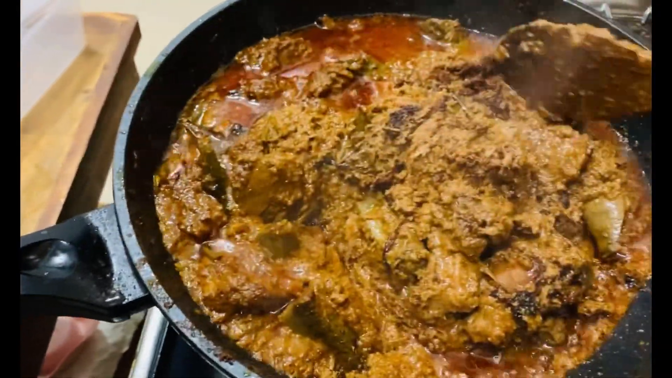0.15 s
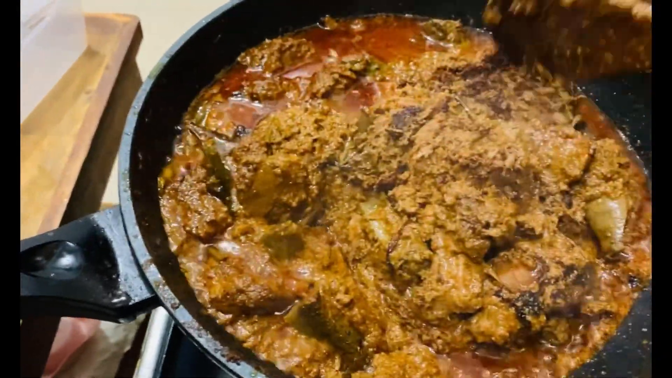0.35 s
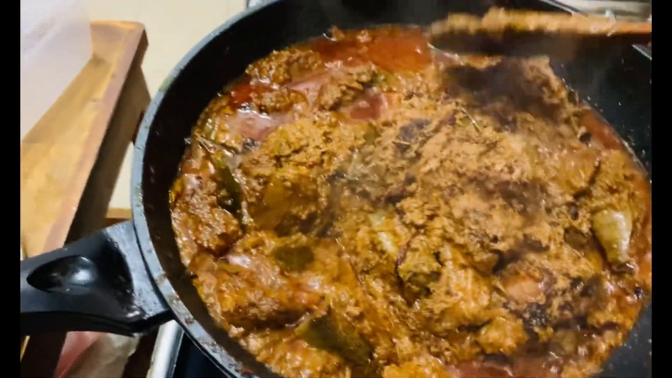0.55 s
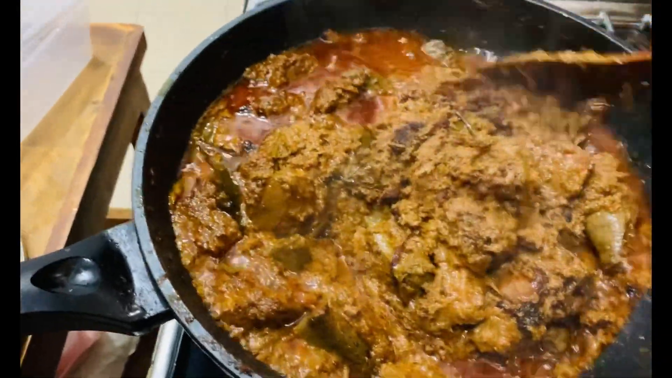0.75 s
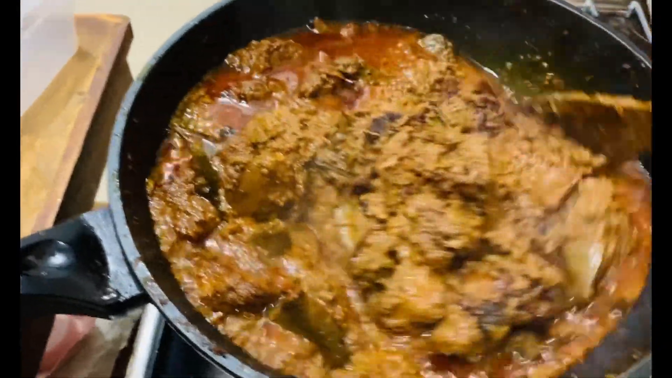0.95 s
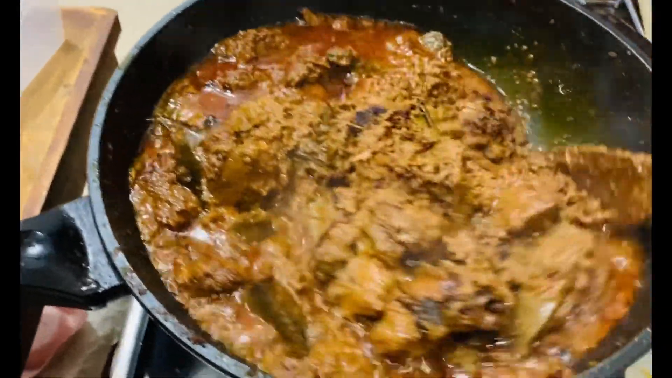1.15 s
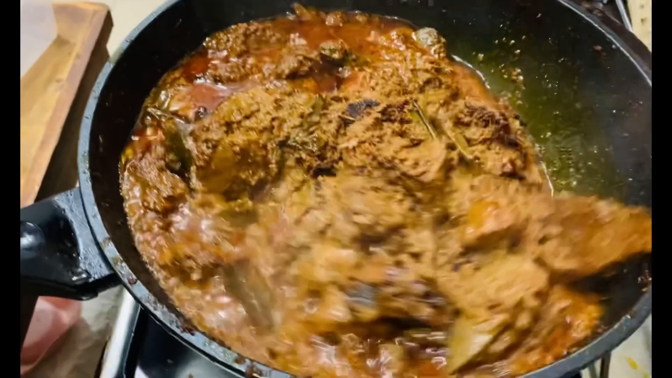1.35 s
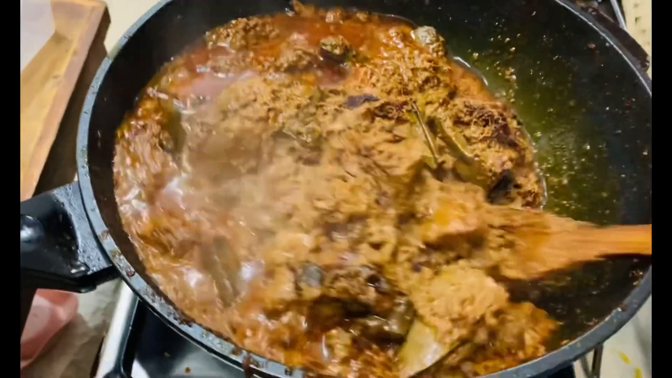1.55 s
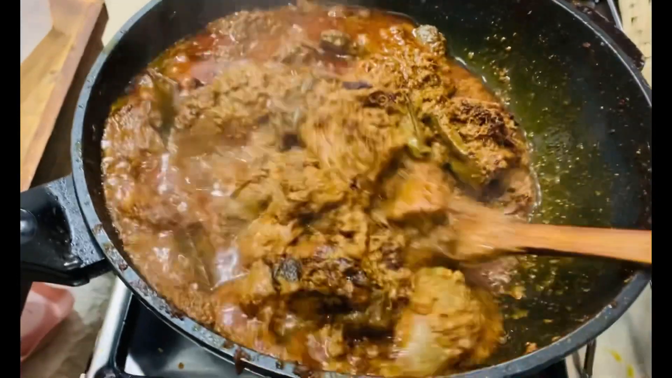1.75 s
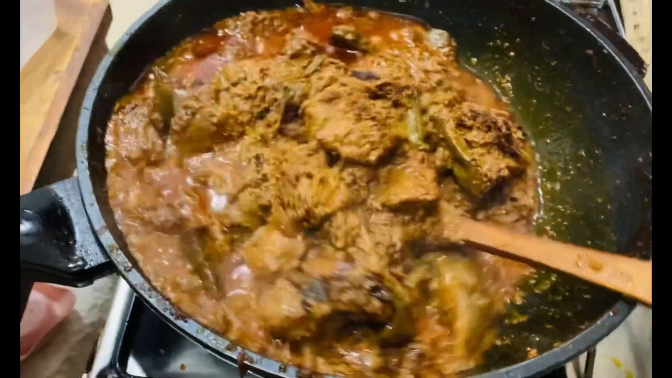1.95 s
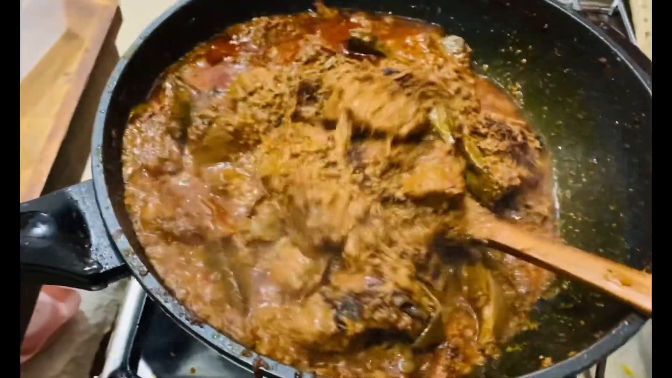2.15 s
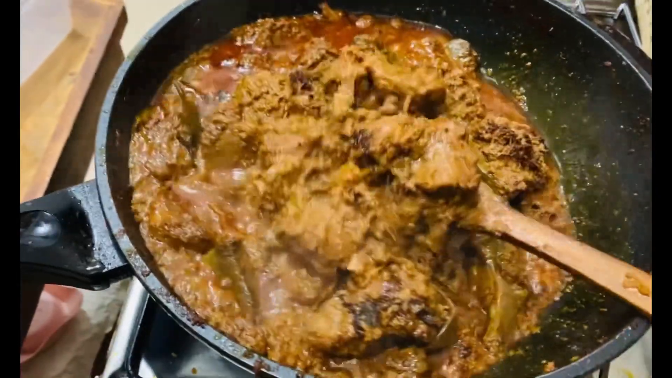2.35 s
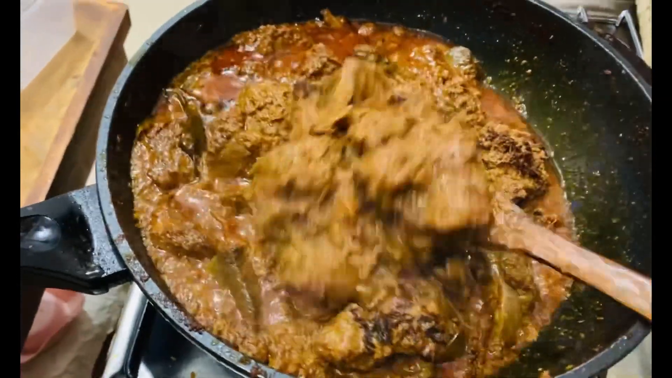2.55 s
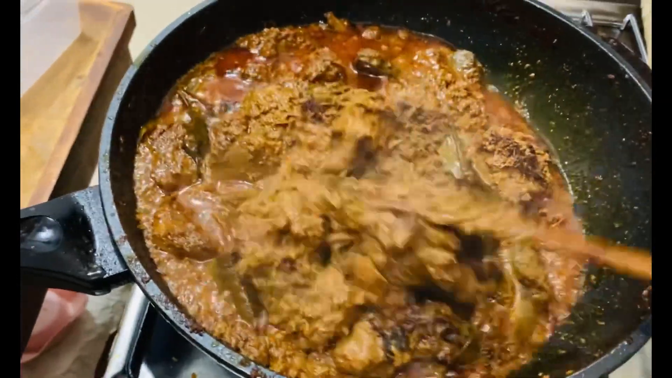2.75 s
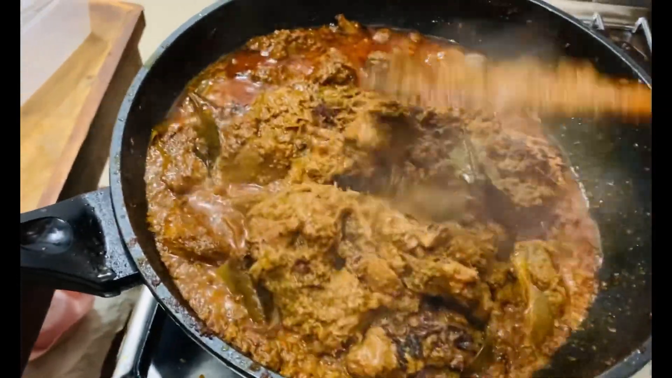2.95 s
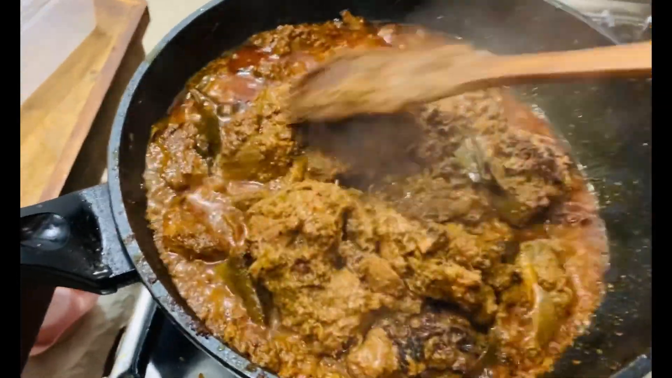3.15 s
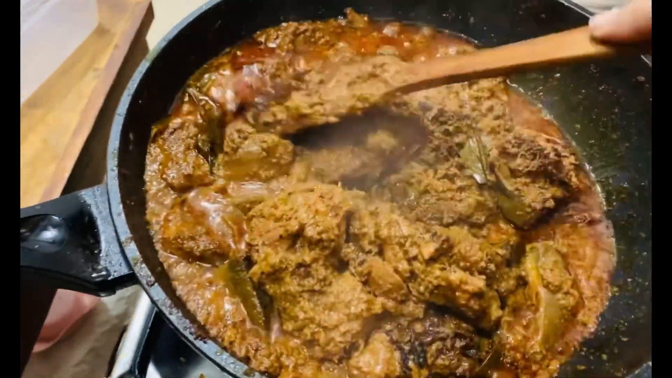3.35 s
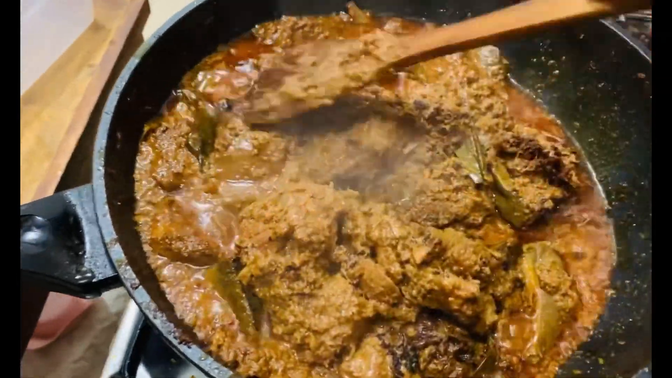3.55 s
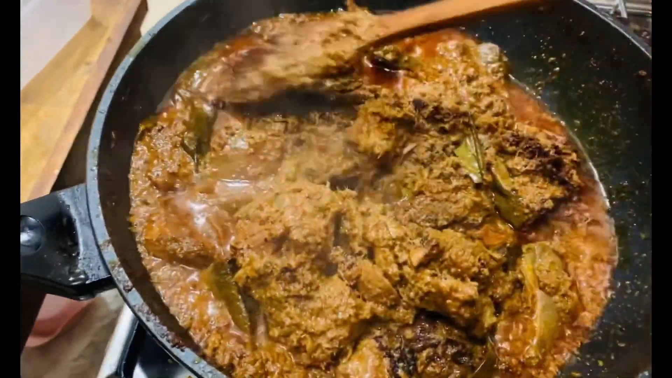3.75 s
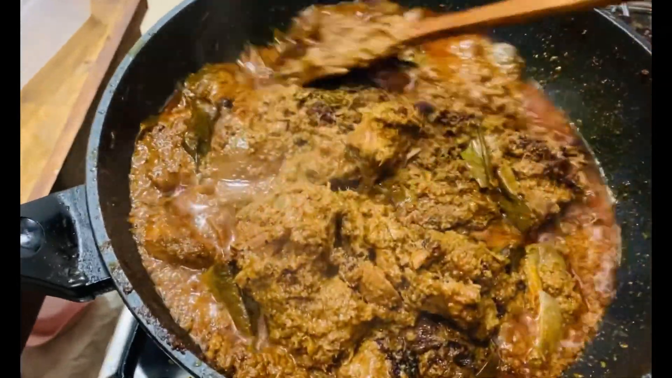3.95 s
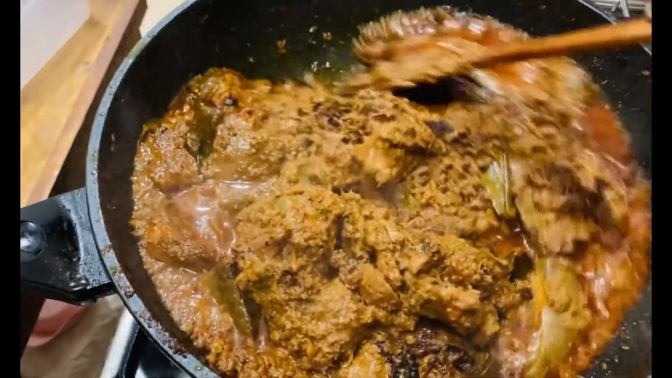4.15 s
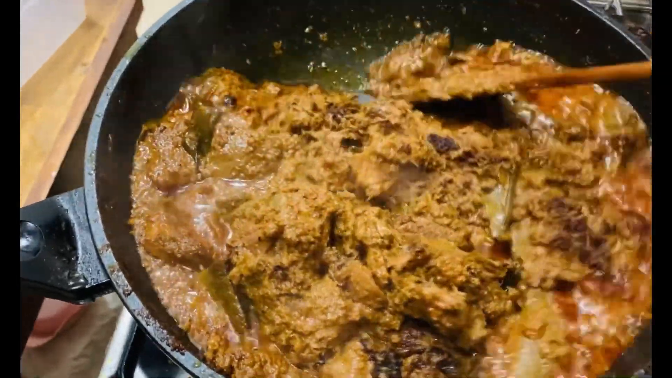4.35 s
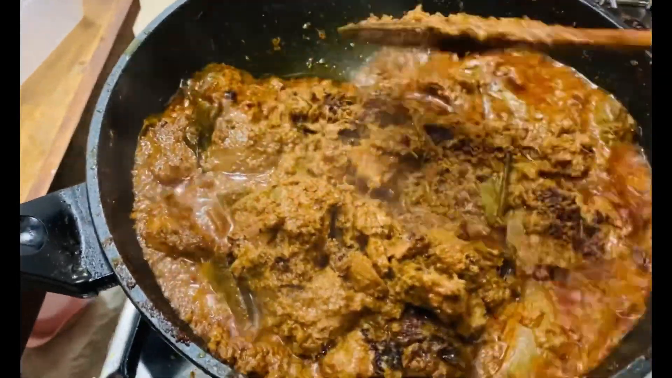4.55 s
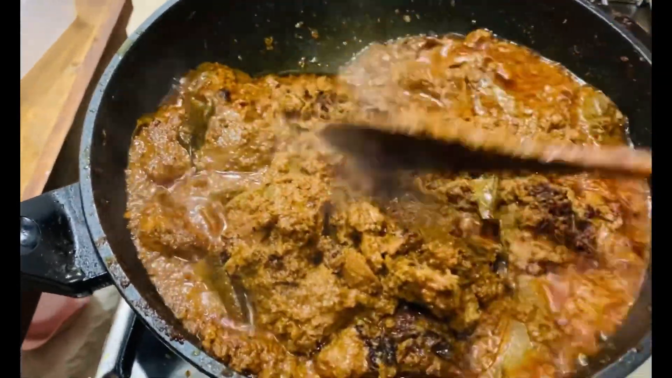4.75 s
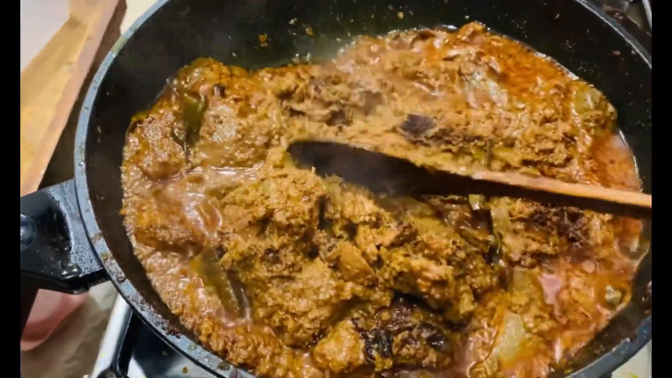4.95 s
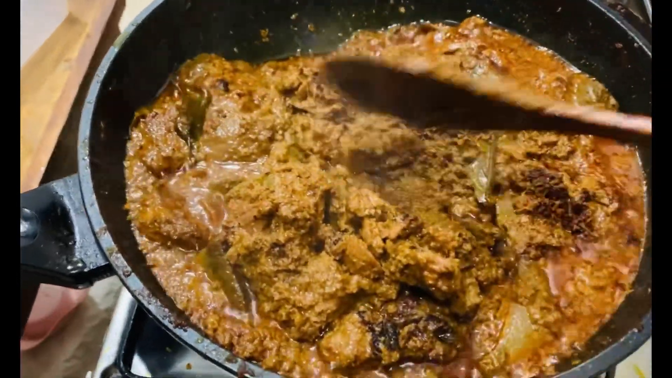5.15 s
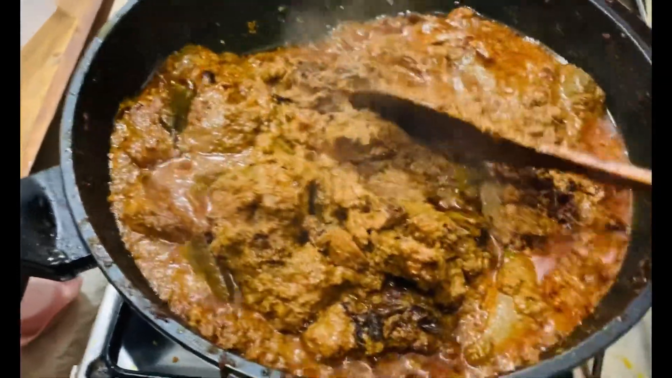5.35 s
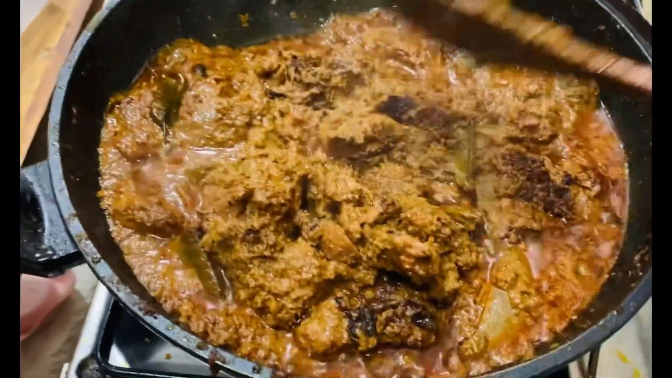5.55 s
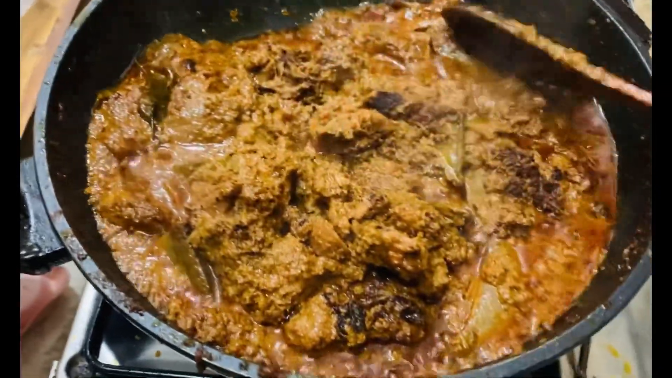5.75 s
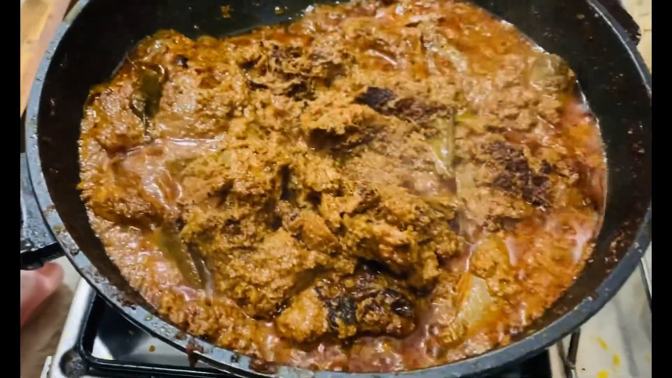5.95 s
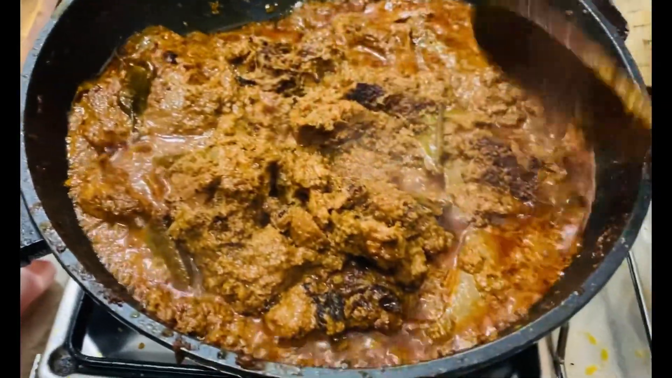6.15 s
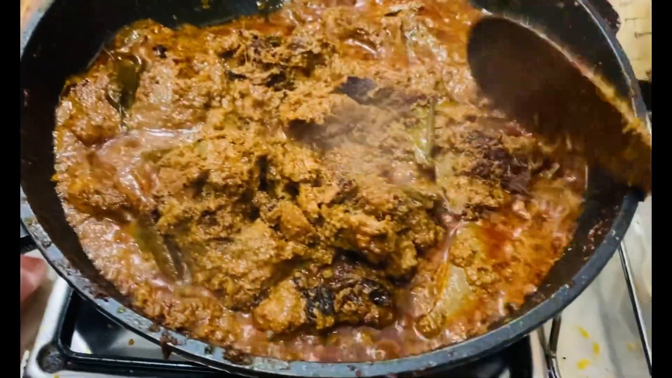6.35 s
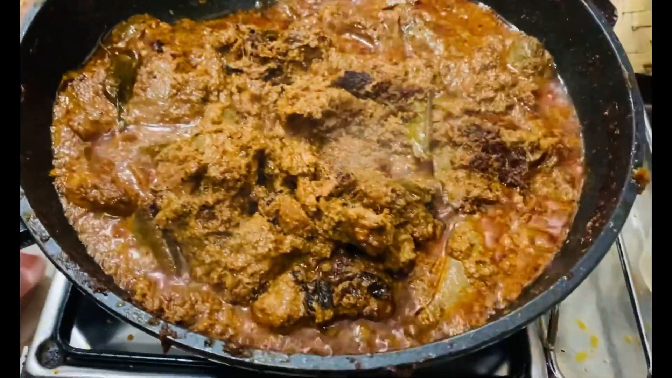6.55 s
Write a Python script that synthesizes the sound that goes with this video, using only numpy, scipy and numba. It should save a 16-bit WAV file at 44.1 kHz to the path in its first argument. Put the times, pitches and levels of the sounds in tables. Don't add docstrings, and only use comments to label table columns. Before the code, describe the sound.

Close up in a small kitchen, thick curry simmers in a wok over softly roaring gas. Oil sizzles and spits brightly at first, a spatula lands with a hollow thud, then stirring strokes release steamy hisses and light scrapes. The sizzle thins to slow blubs, pops and ticks, until two hard wooden knocks ring the wok and rattle it on the grate.

```python
import sys
import numpy as np
from scipy import signal
from scipy.fft import rfft, irfft
from scipy.io import wavfile
from scipy.ndimage import uniform_filter1d
from numba import njit

SR = 44100
rng = np.random.default_rng(int(sys.argv[2]) if len(sys.argv) > 2 else 0)


def volts_from_db(level):
    exponent = np.asarray(level, float) / 20
    return 10 ** exponent


def waveform_to_disk(signal):
    frames = np.transpose(np.atleast_2d(signal))
    scaled = np.clip(frames, -1, 1) * 32767
    samples = np.round(scaled).astype(np.int16)
    wavfile.write(sys.argv[1], SR, samples)


N = 290619
FREQS = np.arange(N // 2 + 1) * SR / N
TOP_HZ = 15870


def level(x, db):
    return x * volts_from_db(db) / np.sqrt(np.mean(x ** 2))


def colour(x, points):
    hz, db = np.transpose(points)
    gain = volts_from_db(np.interp(np.log(FREQS + 1), np.log(hz), db, left=-60, right=-60))
    return level(irfft(rfft(x) * gain, N), 0)


def walk(rate):
    hold = int(SR / rate)
    steps = np.repeat(rng.standard_normal(N // hold + 1), hold)
    return 0.71 * uniform_filter1d(steps, hold)[:N]


@njit
def rings(start, hz, t60, glide, size):
    out = np.zeros(N)
    for e in range(len(start)):
        n = int(t60[e] * SR) + 2
        fade = 1000. ** (-1. / n)
        step, turn = 2 * np.pi * hz[e] / SR, glide[e] ** (1. / n)
        a, phase, first = size[e], 0., int(start[e] * SR)
        for i in range(first, min(first + n, N)):
            out[i] += a * np.sin(phase)
            a, phase, step = a * fade, phase + step, step * turn
    return out


@njit
def svf(x, hz, sharp):
    y, b, l = np.empty(len(x)), 0., 0.
    for i in range(len(x)):
        g = np.tan(np.pi * hz[i] / SR)
        v = (b + g * (x[i] - l)) / (1 + g * (g + 1 / sharp[i]))
        b, l, y[i] = 2 * v - b, l + 2 * g * v, v / np.sqrt(sharp[i])
    return y


def body(modes, lag_s):
    hz, db, t60 = np.transpose(modes)
    signs = (-1.) ** np.arange(len(hz))
    return rings(lag_s + 0 * hz, hz, t60, 1 + 0 * hz, volts_from_db(db) * signs)[:SR]


def swarm(rate, low_hz, high_hz, cycles, spread_db, glide, hiss):
    u = rng.random((int(12000 * N / SR), 4))[:int(rate * N / SR)].T
    hz = low_hz * (high_hz / low_hz) ** u[1]
    db = np.minimum(-spread_db * np.log(1 - u[2]), 5 * spread_db)
    t60 = cycles * (.5 + u[3]) / hz
    bubbles = rings(u[0] * N / SR, hz, t60, glide + 0 * hz, volts_from_db(db) * np.sqrt(hz))
    bubbles = colour(bubbles, [(low_hz / 2, 0), (high_hz * 3.8, 0)])
    here = level(bubbles, 0) + hiss * rng.standard_normal(N)
    return np.array([here, np.roll(here, SR)])


def bursts(table, cycles, glide, gain_db, snap, tear_s=.0045, crowd=.61):
    s, db, hz = np.transpose(table)
    size, flat = volts_from_db(db + gain_db), np.ones(len(s))
    out = rings(s, hz, cycles / hz, glide * flat, size)
    out += rings(s, 1.3 * hz, 1.6 / hz, flat, 2 * snap * size)
    for late, pitch, small in rng.random((128, 3, 3))[:len(s)].T:
        near_hz = np.minimum(hz * (.65 + .9 * pitch), TOP_HZ)
        out += rings(s + tear_s * late, near_hz, cycles / hz, glide * flat, crowd * small * size)
    return out


# t/s, heat level/dB
BARED_HEAT = [(0, 1), (.2, -0.5), (.7, -1.5), (.94, 1), (1.14, -1.5), (1.32, -1.5), (1.5, 1), (1.85, 0),
              (2.05, -3.5), (2.8, -5), (3.05, -7.5), (3.36, -4.5), (3.61, -9), (4.2, -5.5), (4.64, -8),
              (5.4, -8), (5.8, -8.5), (6.59, -7.5)]


def heated(full_db, slope):
    s, heat_db = np.transpose(BARED_HEAT)
    return full_db + slope * np.interp(np.arange(N) / SR, s, heat_db)


# f/Hz, level/dB per Hz
SIZZLE_COLOUR = [(3000, -20.5), (6000, -6), (7000, -5), (8600, 6), (10500, 2.5), (13000, 2), (15700, 3.5)]


def sizzle():
    fizz = swarm(rate=8700.0, low_hz=5053.0, high_hz=16360.0, cycles=27.0, spread_db=4.5, glide=0.92, hiss=0.99)
    gusts = 2.0 * walk(19) + 1.5 * walk(45)
    return colour(fizz, SIZZLE_COLOUR) * volts_from_db(heated(-42.5, 1.166) + 6.0 + gusts)


# f/Hz, level/dB per Hz
CRACKLE_COLOUR = [(1500, -17), (1750, -5), (2200, -5.5), (3400, 0.5), (4500, -0.5), (5600, -5.5),
                  (6600, -0.5), (8000, -9.5)]


def crackle(surge):
    snaps = swarm(rate=380., low_hz=1500., high_hz=7000., cycles=30., spread_db=2.6, glide=1.1, hiss=1.0)
    return colour(snaps, CRACKLE_COLOUR) * volts_from_db(heated(-44.5, 0.99) - .5 + 1.9 * surge + 1.5 * walk(9))


# f/Hz, level/dB per Hz
BLUB_COLOUR = [(120, -35), (200, -3), (300, 0.5), (450, 4), (600, 1), (800, -2), (1100, -26.5)]
# f/Hz, level/dB per Hz
SPUTTER_COLOUR = [(500, -1), (850, -5.5), (1150, -2), (1440, -4), (1560, -6), (1800, -8), (2400, -9.5),
                  (3500, -11)]


def paste(surge):
    blubs = swarm(rate=300., low_hz=180., high_hz=1000., cycles=8., spread_db=1.7, glide=1.2, hiss=1.3)
    small = swarm(rate=500., low_hz=696.0, high_hz=3016.0, cycles=13., spread_db=1.24, glide=1.15, hiss=1.6)
    blubs = colour(blubs, BLUB_COLOUR) * volts_from_db(heated(-47, 0.12) - 2.5 + 1.4 * surge)
    small = colour(small, SPUTTER_COLOUR) * volts_from_db(heated(-41.5, 0.68) - 2.5 + .7 * surge)
    return blubs + small


# f/Hz, level/dB per Hz
FLAME_COLOUR = [(24, -39), (48, -7.5), (70, -15.5), (97, -3.5), (165, -12), (220, -2.5), (300, -2.5),
                (640, -35)]
# middle t/s, half length/s, rumble level/dB
DRAGS = [
    (0.841, 0.094, 10),
    (1.624, 0.32, 9.5),
    (2.596, 0.212, 4.5),
    (3.298, 0.23, 2.5),
    (4.297, 0.2, 5),
]


def flame():
    t = np.arange(N) / SR
    shake = sum(db * np.exp(-((t - s) / half) ** 4) for s, half, db in DRAGS)
    roar = colour(rng.standard_normal((2, N)), FLAME_COLOUR)
    bass = signal.sosfilt(signal.butter(2, 150, fs=SR, output="sos"), roar)
    return (roar + (volts_from_db(shake) - 1) * bass) * volts_from_db(-52 + 0.91 * walk(5.7))


# t/s, peak level/dB, f/Hz
CRACKS = [
    (0.0393, -31, 14700),
    (0.4959, -18.5, 15400),
    (1.051, -18, 15000),
    (1.2855, -21, 14800),
    (1.6716, -34, 15600),
    (1.8208, -12, 15440),
    (1.976, -32, 15000),
]


def cracks():
    return bursts(CRACKS, cycles=15.0, glide=.97, gain_db=7.0, snap=0.45, tear_s=.001, crowd=.5)


# t/s, peak level/dB, f/Hz
PLOPS = [(0.055, -32, 354), (0.28, -36.5, 758), (0.885, -32.5, 258), (0.94, -38, 240), (0.97, -38, 266),
         (1.288, -32, 303), (1.819, -26, 740), (1.954, -33, 820), (2.057, -45, 950), (2.107, -26, 923),
         (2.247, -24, 835), (2.426, -46.5, 222), (2.52, -27.5, 716), (2.807, -37, 263), (2.946, -34, 294),
         (2.7, -30, 750), (3.171, -34, 390), (3.2, -31, 530), (3.326, -34, 274), (3.394, -31.5, 390),
         (3.525, -36, 224), (3.719, -39, 473), (3.768, -33.5, 546), (3.804, -38, 310), (3.931, -30, 680),
         (4.02, -34, 310)]


def plops():
    return bursts(PLOPS, cycles=9., glide=1.12, gain_db=-3, snap=.05)


# t/s, peak level/dB, f/Hz
SPITS = [(0.0667, -34, 10800), (0.0887, -22, 9800), (0.1585, -34.5, 10040), (0.2274, -23.5, 10870),
         (0.2495, -24, 10400), (0.3856, -28, 10500), (0.4966, -25.5, 12200), (0.511, -29.5, 10400),
         (0.5412, -31, 10340), (0.7545, -25, 11100), (0.816, -24, 10400), (0.9073, -29, 11600),
         (1.051, -15, 10800), (1.285, -32, 10100), (.7288, -23, 9800), (1.5868, -40, 10620),
         (1.6911, -35, 11100), (1.804, -21, 11540), (2.168, -36, 10650), (2.3161, -25.5, 10100),
         (2.4997, -29.5, 11000), (4.884, -29, 10300), (4.9043, -27, 10300), (5.1153, -28.5, 10400),
         (5.3433, -30, 10660), (5.841, -31.5, 10600), (6.1248, -24.5, 9700), (6.33, -29.5, 10700),
         (6.379, -32, 12000), (6.571, -29, 10550)]


def spits():
    return bursts(SPITS, cycles=19.0, glide=0.58, gain_db=7.5, snap=0.5)


# t/s, peak level/dB, f/Hz
SNAPS = [(0.0887, -20.5, 7130), (0.1005, -18, 6910), (0.14, -22.5, 5860), (0.53, -23.5, 7170),
         (0.5844, -22.5, 6320), (0.641, -20, 4760), (0.6791, -31, 7200), (0.7288, -20, 6700),
         (1.691, -20.5, 7300), (1.74, -18, 6020), (1.823, -28, 4650), (5.3447, -24, 4960)]
# t/s, peak level/dB, f/Hz
POPS = [(0.184, -34, 1810), (0.2844, -24.5, 1300), (1.0771, -28.5, 1460), (1.2614, -30, 1822),
        (1.4945, -28, 1480), (1.5467, -26.5, 2140), (1.725, -29, 1770), (1.8543, -30.5, 1500),
        (1.976, -31, 1283), (2.0588, -37, 1440), (2.2469, -31, 1250), (2.5697, -33, 1310), (2.7, -33, 1385),
        (3.1863, -32.5, 1527), (3.327, -34, 1800), (3.4142, -34.5, 1450), (3.7643, -32, 1860),
        (4.104, -37, 1413), (4.1707, -29, 1300), (4.237, -28.5, 1300), (4.5275, -32.5, 1440),
        (4.8982, -31.5, 1410), (4.9462, -29, 1463), (4.9871, -32.5, 1552), (5.095, -35, 1340),
        (5.224, -35.5, 1274), (5.682, -39, 1420), (5.7044, -27.5, 1940), (5.787, -34, 1630),
        (5.8405, -30, 1470)]
# t/s, peak level/dB, f/Hz
STIRRED = [(1.605, -30.5, 1497), (1.712, -30, 1705), (2.133, -34, 1220), (2.169, -37, 1286),
           (2.3146, -31, 1270), (2.4797, -44, 1080), (2.4998, -35.5, 1230), (2.584, -29.5, 2030),
           (2.6712, -37, 1430), (3.526, -41, 1200), (3.5951, -33.5, 1480), (3.7208, -38, 1277),
           (3.7403, -41.5, 1210), (3.8071, -30.5, 1930), (4.14, -35, 1186), (4.2012, -45, 1080),
           (4.2692, -30, 1600)]


def pops():
    when, pitch = rng.random((30, 2)).T
    stray_hz = 1308 * 2 ** (1.4 * pitch ** 2)
    strays = list(zip(when * N / SR, np.full(30, -35.), stray_hz))
    table = POPS + STIRRED + SNAPS + strays
    return bursts(table, cycles=16.0, glide=1.2, gain_db=1.0, snap=0.18, tear_s=.005, crowd=.8)


# t/s, peak level/dB, f/Hz
FINE_POCKETS = [(.7285, -25, 2380), (.729, -23, 3310), (.7288, -28.5, 1250), (.641, -27.5, 2600),
                (.7283, -21, 905), (.7683, -29, 1000), (2.058, -19, 6200), (2.38, -31, 3900),
                (2.39, -30.5, 3400), (2.4614, -28, 4200), (2.51, -28, 5200), (2.7462, -42.5, 2030),
                (2.835, -31, 3720), (3.0944, -33, 2020), (3.1665, -25, 1157), (3.769, -29, 4800),
                (3.829, -30, 2100), (3.871, -33, 2000), (3.876, -33, 2900), (3.885, -28.5, 4240),
                (3.929, -35, 3800), (3.988, -33, 2000), (4.005, -29, 6300), (4.0253, -36, 2770),
                (4.107, -31, 2510), (4.1185, -28, 3600), (4.2014, -33.5, 2130), (4.3092, -34, 2300),
                (4.616, -29, 5010), (4.657, -31.5, 1110), (4.7137, -38.5, 2420), (5.2475, -40, 3520),
                (5.4745, -37, 3400), (5.5977, -37, 2800), (5.7873, -42, 2710), (5.902, -36, 2065),
                (5.9095, -34, 2780), (5.9409, -33.5, 5000), (6.109, -33, 2810), (6.3095, -26.5, 2855),
                (6.393, -29.5, 3300)]


def fine_pockets():
    return bursts(FINE_POCKETS, cycles=12.0, glide=1.5, gain_db=-1.5, snap=0.43, tear_s=.003, crowd=0.46)


# f/Hz, level/dB, t60/s
WOK_MODES = [(507, -1.5, 0.034), (650, -12.5, 0.061), (871.5, 0, 0.067), (1110, 5.5, 0.028),
             (873.5, -14, 0.43), (1000, -9, 0.12), (848, -14, 0.11), (1237, -5, 0.08), (1524, -26, 0.15),
             (1810, -15.5, 0.1), (2337, -11.5, 0.091), (1250, -21.5, 0.28), (2600, -15, 0.069)]
# f/Hz, level/dB, t60/s
GRATE_MODES = [(215, -9, 0.105), (274.2, -11, 0.17), (340, -9.5, 0.028), (302, -16.5, 0.3),
               (396, -15, 0.036), (576, -21.5, 0.21), (467, -15.5, 0.034)]
# f/Hz, level/dB, t60/s
BOOM_MODES = [(91, 1.5, 0.417), (110.7, -0.5, 0.54), (65.2, -2.5, 0.35), (43.8, -4, 0.31)]
# f/Hz, level/dB per Hz
RATTLE_COLOUR = [(150, -9), (230, 1), (500, -7.5), (700, -9), (900, -11), (1250, -12), (1400, -27),
                 (2600, -23)]
# t/s, blow level/dB, contact/ms, grate share level/dB
KNOCKS = [
    (0.7268, -42.5, 0.99, 17.5),
    (1.289, -42, 0.69, 3),
    (6.1189, -29.5, .4, -9),
    (6.1196, -13, 0.52, -1.5),
    (6.3273, -23, .35, -10),
    (6.3284, -10, 0.67, -0.5),
]


def knocks():
    wok, grate = body(WOK_MODES, 0), body(GRATE_MODES, 0.0023)
    wok, grate = signal.sosfilt(signal.butter(2, 140, "high", fs=SR, output="sos"), [wok, grate])
    grate = grate + volts_from_db(-22.5) * body(BOOM_MODES, 0.0085)
    loose = colour(rng.standard_normal(N), RATTLE_COLOUR)
    rattle_db, rattle_t60_s = -19, 0.25
    out = np.zeros(N)
    for s, db, ms, grate_db in KNOCKS:
        t = np.arange(N) / SR - s
        push = volts_from_db(db) * np.sin(np.pi * np.clip(t * 1000 / ms, 0, 1)) / (ms * SR / 1000)
        out += signal.fftconvolve(push, wok + volts_from_db(grate_db) * grate)[:N]
        fade = np.clip(t / 0.0026, 0, 1) * volts_from_db(-60 * np.abs(t) / rattle_t60_s)
        out += volts_from_db(db + rattle_db) * loose * fade
    return out * volts_from_db(5.0)


# t/s, peak level/dB, f/Hz
THUD = [
    (.7305, -26, 310),
    (.7305, -28, 320),
    (.735, -30.5, 102),
    (.733, -45, 178),
]


def thud():
    return bursts(THUD, cycles=38.0, glide=1.2, gain_db=-7.0, snap=.1, tear_s=.002, crowd=0)


# t/s, level/dB, attack/s, hold/s, release/dB per s
STROKES = [
    (1.264, -41, 0.03, 0.15, 153),
    (1.5, -36, 0.22, 0.14, 56),
    (1.89, -44.5, 0.11, 0.34, 10.5),
    (1.2, -44.5, 0.031, 0.16, 53),
]
# first f/Hz, last f/Hz, sinking time/s, sharpness
TROUGHS = [
    (4600, 4100, 0.2, 3.5),
    (2230, 1050, 0.36, 2),
    (1025, 850, 0.21, 2.6),
    (2100, 1700, 0.29, 1.6),
]


def furrow():
    sputter = swarm(rate=900., low_hz=700., high_hz=5000., cycles=20., spread_db=2.4, glide=1.05, hiss=1.2)
    wobble, flicker_db = 1 + 0.037 * walk(26), 0.66 * walk(20)
    onset_db, closes_s, closing_db_s = -1.5, .72, 88
    out = 0
    for (s, db, attack, hold, release), (first_hz, last_hz, sink, sharp) in zip(STROKES, TROUGHS):
        t = np.arange(N) / SR - s
        hz = (last_hz + (first_hz - last_hz) * np.exp(-np.maximum(t, 0) / sink)) * wobble
        sharp = np.full(N, max(sharp, 1.))
        trough = 0
        for ratio, share in [(1, 1), (1.37, 0.49), (3.1, 0.3)]:
            trough = trough + share * np.array([svf(row, ratio * hz, sharp) for row in sputter])
        rise = onset_db * np.clip(1 - t / attack, 0, 1)
        fall = release * np.maximum(t - attack - hold, 0)
        fall += closing_db_s * np.maximum(t - closes_s, 0)
        out = out + level(trough, db) * volts_from_db(rise - fall + flicker_db) * np.clip(t / 0.037, 0, 1)
    return out


# t/s, peak level/dB, f/Hz
TICKS = [(2.3472, -30.5, 3260), (2.5, -29, 3640), (2.528, -29, 3850), (2.619, -28, 3800),
         (2.9576, -26, 4100), (3.1667, -29, 3310), (3.187, -24.5, 4050), (3.271, -32, 4020),
         (3.325, -24, 4180), (3.48, -29, 3830), (3.562, -30.5, 2410), (3.654, -24, 3780),
         (3.7153, -33, 2160), (3.7758, -22, 4370), (3.8543, -25.5, 2320), (3.8828, -28.5, 2600),
         (3.9325, -23, 2600), (4.051, -28, 2450), (4.116, -29, 2755), (4.247, -33, 2433),
         (4.658, -25, 2310), (4.7766, -28.5, 2230), (4.808, -30.5, 2160), (4.958, -27, 2600),
         (5.2835, -30.5, 2600), (5.555, -31, 2940), (5.8062, -26, 3050), (5.8417, -29, 2303),
         (5.685, -37, 3110), (6.039, -40, 2700), (3.3453, -30.5, 3880), (3.4131, -31.5, 2800),
         (3.5264, -32.5, 3630), (3.722, -30.5, 3900), (3.7533, -36, 4900), (3.9345, -27, 4000),
         (4.14, -35.5, 3040), (4.1719, -42, 2990), (2.40, -28, 3600), (2.645, -30, 3480), (1.31, -27, 2290),
         (1.385, -25.5, 3040)]


def ticks():
    return bursts(TICKS, cycles=20., glide=1.2, gain_db=-2.5, snap=.45, tear_s=.004, crowd=.6)


# f/Hz, level/dB, t60/s
WALL_MODES = [(1244, -6, .1), (1485, 2.5, .1), (1715, -4.5, 0.11), (1996, -1, .15), (2160, -3.5, 0.11),
              (2391, -6, .12), (2690, -4, .15), (3920, -5, .04), (4700, -8, .04)]
# middle t/s, half length/s, level/dB
SCRAPES = [
    (1.59, .08, -42.5),
    (1.8, .1, -41),
    (3.875, .1, -54.5),
    (4.928, 0.058, -53.5),
]


def scrape():
    t = np.arange(N) / SR
    slips = rng.standard_normal((2, N)) * (rng.random((2, N)) < 900 / SR)
    wall = body(WALL_MODES, 0)[None, :SR // 4]
    ring = level(signal.fftconvolve(slips, wall)[:, :N], 0)
    return ring * sum(volts_from_db(db) * np.exp(-((t - s) / half) ** 4) for s, half, db in SCRAPES)


# t/s, peak level/dB, f/Hz
SETTLING = [(3.07, -33.5, 3100), (3.203, -31.5, 3000), (3.43, -34, 2880), (3.45, -33, 2800),
            (3.5, -33, 2500), (3.655, -30, 2800), (4.3353, -33, 1810), (4.4121, -35.5, 1660),
            (4.4585, -34, 1910), (4.5488, -36, 2300), (4.56, -36, 3700), (4.6331, -38, 2100),
            (4.81, -34, 3440), (4.8246, -34, 2160), (4.8506, -37, 1980), (5.0082, -36, 1730),
            (5.1738, -36, 3400), (5.1888, -34, 3200), (5.2706, -37, 2000), (5.327, -32, 1150),
            (5.3415, -32.5, 1590), (5.3694, -36, 3300), (5.4033, -35, 2920), (5.6143, -36, 3120),
            (5.9695, -39, 1720), (6.0643, -38, 3630), (6.172, -32, 2800), (6.4405, -29, 2250),
            (6.5085, -30, 2600), (3.167, -30, 2200), (5.841, -32, 4900)]


def settling():
    return bursts(SETTLING, cycles=19., glide=1.15, gain_db=-1.0, snap=.3, tear_s=.003, crowd=.3)


# t/s, peak level/dB, f/Hz
RIM_PINGS = [
    (6.1205, -30, 3970),
    (6.1205, -37, 4360),
    (6.3275, -28, 1980),
    (6.331, -32.5, 6900),
    (6.380, -34.5, 6530),
    (6.329, -36, 3050),
    (6.329, -36, 4100),
]


def rim_pings():
    return bursts(RIM_PINGS, cycles=80.5, glide=0.99, gain_db=-0.5, snap=0.38, crowd=.05)


# t/s, peak level/dB, f/Hz
SLOSH = [
    (7.4, -30, 480),
    (6.318, -31, 507),
    (10, -31.5, 470),
    (6.366, -38, 407),
    (6.41, -31, 300),
]


def slosh():
    return bursts(SLOSH, cycles=30., glide=1.35, gain_db=-2.5, snap=.01, tear_s=0.004, crowd=0.05)


# f/Hz, right leads/rad, likeness/0-1, right over left level/dB
PORTS = [(0, 1, 0.95, 3.5), (148, 0, 1, 0), (750, 0.5, 0.76, -1.42), (1035, -0.5, .92, 0),
         (1710, 0.58, 0.7, -1.5), (2450, 0.34, 0.4, 0), (3305, -2, 0.3, 0.5), (5652, -1.3, 0, 8)]
# f/Hz, right leads/rad, likeness/0-1, right over left level/dB
TREBLE_PORTS = [(6500, 0, .52, 0), (8500, 3.1, .84, 0), (11100, 6.3, .95, 0), (13400, 9.4, .84, 0),
                (15800, 12.6, .95, 0)]


def ports(x, other):
    hz, lead, like, db = np.transpose(PORTS + TREBLE_PORTS)
    like = np.clip(np.interp(FREQS, hz, like), 0, 1)
    shared = like * np.exp(1j * np.interp(FREQS, hz, lead)) * rfft(x)
    right = shared + np.sqrt(1 - like ** 2) * rfft(other)
    tilt = volts_from_db(np.interp(FREQS, hz, db) / 2)
    return irfft(np.array([rfft(x) / tilt, right * tilt]), N)


def kitchen(x):
    t60_s, tail_db = 0.5, -18
    t = np.arange(SR // 2) / SR
    tail = rng.standard_normal((2, len(t))) * 1000 ** (-t / t60_s) * np.clip(t / .015, 0, 1)
    tail = signal.lfilter([.3], [1, -.7], tail + 0.14 * tail[::-1])
    tail = volts_from_db(tail_db) * tail / np.sqrt(np.sum(tail ** 2) / 2)
    return signal.fftconvolve(x[None], tail)[:, :N]


def scene():
    surge = walk(22)
    here, there = sizzle() + crackle(surge) + paste(surge) + flame() + furrow() + scrape()
    single = cracks() + plops() + spits() + pops() + fine_pockets() + knocks() + thud()
    single += ticks() + settling() + rim_pings() + slosh()
    glance = np.roll(single, int(.0003 * SR))
    return ports(here + single, there + glance) + kitchen(single)


def band_limit(x):
    return signal.sosfilt(signal.butter(12, 17100, fs=SR, output="sos"), x)


def record(dry):
    mix = signal.sosfilt(signal.butter(2, 59.3, "high", fs=SR, output="sos"), dry)
    mix = signal.sosfilt(signal.ellip(8, .2, 60, TOP_HZ, fs=SR, output="sos"), mix)
    return band_limit(mix)


dry = scene()
out = record(dry)
waveform_to_disk(out)
```